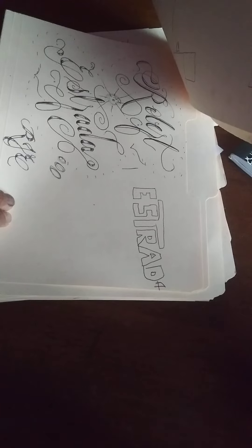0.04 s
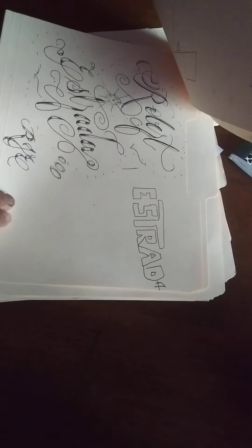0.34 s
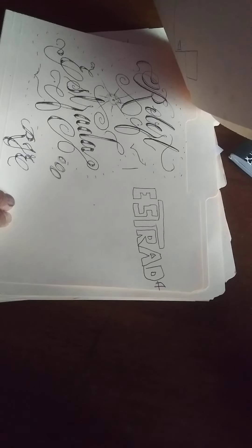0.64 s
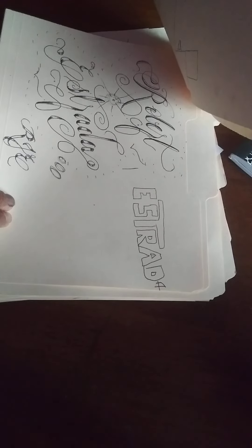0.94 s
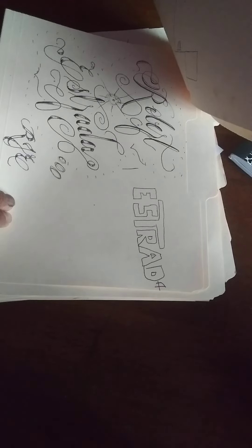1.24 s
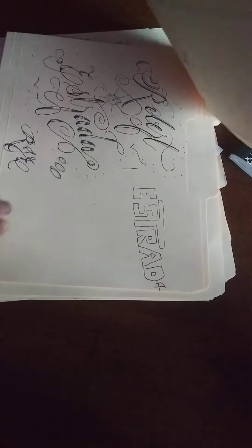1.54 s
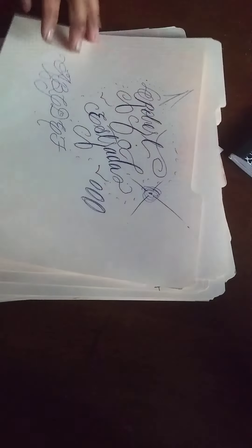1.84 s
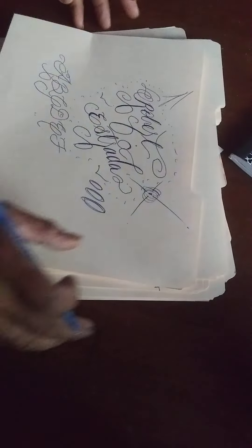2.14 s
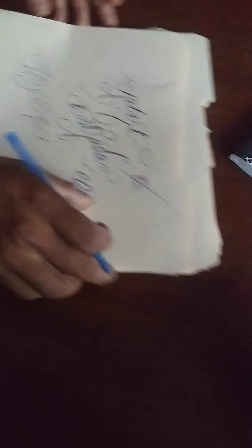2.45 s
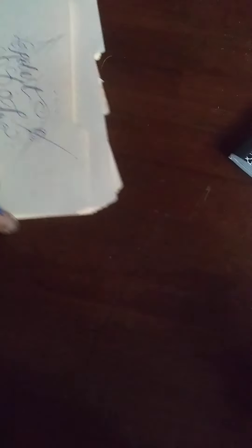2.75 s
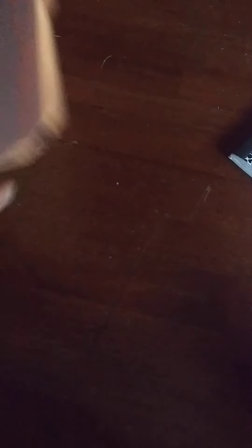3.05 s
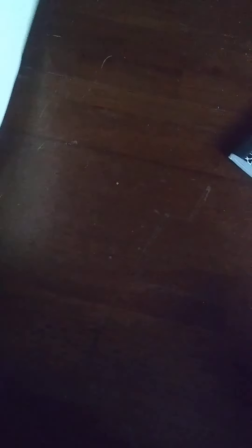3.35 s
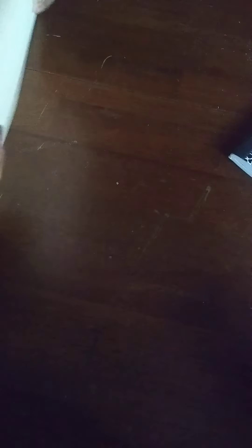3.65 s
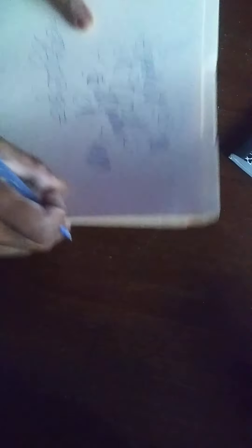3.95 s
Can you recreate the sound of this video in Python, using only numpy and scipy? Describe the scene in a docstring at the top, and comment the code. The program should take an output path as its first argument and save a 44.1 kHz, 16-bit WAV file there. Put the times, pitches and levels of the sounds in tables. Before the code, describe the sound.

Paper folders are handled, dragged over wood and dropped with a sharp slap.

```python
"""A fan hums faintly in a small, quiet room while card folders are handled on a wooden table.
First one folder is peeled off the pile, its fibres catching and its edge scraping along a neighbour.
Then fingers grip the pile and slide it off the table edge with dull bumps; it rustles in the hands.
Finally it is slapped down: the sheets land in a quick cascade, the table and the room ring,
and a last soft rustle follows."""
import sys
import numpy as np
from scipy import signal
from scipy.fft import rfft, irfft, next_fast_len
from scipy.io import wavfile
from scipy.ndimage import uniform_filter1d, minimum_filter1d, map_coordinates

SR = 44100
rng = np.random.default_rng(int(sys.argv[2]) if len(sys.argv) > 2 else 0)


def digitize_waveform(pressure):
    """Quantize a signal to 16-bit integers and store it at the path in sys.argv[1].

    Rows of a 2-D input are taken as channels; values are limited to [-1, 1].
    """
    field = np.atleast_2d(pressure).T
    bounded = np.clip(field, -1, 1)
    quanta = np.round(bounded * 32767).astype(np.int16)
    wavfile.write(sys.argv[1], SR, quanta)


N = 176400

# Impacts: start_s, level_db, cutoff_hz
SHEET_LANDINGS = [(3.5446, -33.5, 1120), (3.5557, -19, 10100), (3.564, -19, 9050), (3.5703, -18, 9000),
                  (3.576, -20, 9000), (3.5825, -19, 22000), (3.593, -23.5, 9000), (3.604, -26, 7040),
                  (3.624, -26.5, 2020), (3.639, -24.5, 885)]  # sheets landing one after another
TABLE_BUMPS = [(1.587, -58, 900), (1.908, -53.5, 1100), (1.926, -53, 1300), (2.207, -59, 1100),
               (2.246, -50.5, 294), (2.465, -54, 400), (2.518, -52.5, 308), (2.673, -51, 453),
               (2.786, -44.5, 310), (2.815, -47.5, 230), (3.003, -48.5, 324), (3.1331, -52, 2400),
               (3.142, -50.5, 1660), (3.149, -51, 1890)]  # hands and pile bumping the table
EDGE_FLICKS = [(1.591, -51.5, 12000), (1.608, -54.5, 7900), (1.629, -52, 7000), (3.143, -50, 8800),
               (3.276, -54.5, 6100), (3.795, -52, 12000)]  # card edges flicking past each other
# Spectra of those impacts: frequency_hz, gain_db
SLAP_SPECTRUM = [(70, -16.5), (110, -13), (200, -15), (250, -3.5), (420, 1.5), (580, -3.5), (1000, -2),
                 (1350, -7.5), (2500, -13.5), (3700, -20), (4700, -21), (5700, -27.5), (7200, -24),
                 (15000, -18.5)]
BUMP_SPECTRUM = [(70, -9), (120, 4.5), (170, 2.5), (260, 9.5), (380, -1.5), (750, 0.5), (1500, -2),
                 (6000, -6)]
FLICK_SPECTRUM = [(300, -14), (1500, 4.5), (4800, 0), (10000, 4.5), (15000, -3)]
# Resonances of the room and table that ring after a slap or bump: pitch_hz, relative_level_db, t60_s
RINGING_MODES = [(115.8, -11.5, 0.34), (246, -3, 0.34), (258.6, -9, 0.29), (338, -4, 0.4),
                 (376.7, -5.5, 0.22), (426.6, 6.5, 0.29), (525, -1.5, 0.33), (560, -4, 0.36),
                 (636, -3.5, 0.22), (656, 1.5, 0.25), (726, 4.5, 0.27), (787, -12.5, 0.54), (884, 1, 0.39),
                 (920, 6, 0.21), (1023, -1, 0.25), (1077, -5.5, 0.38), (1113, -2.5, 0.39), (1156, -4, 0.24),
                 (1618, -6.5, 0.36)]
# Envelopes of rubbing: time_s, relative_level_db
PEEL_ENVELOPE = [(1.41, -81), (1.46, -60), (1.52, -55), (1.565, -53), (1.595, -50), (1.665, -51.5),
                 (1.74, -52.5), (1.78, -50), (1.87, -52), (1.915, -49), (1.94, -44.5), (1.966, -58),
                 (2.05, -87)]  # folder peeled off the pile
SLIDE_ENVELOPE = [(2.2, -78), (2.222, -62), (2.295, -67), (2.335, -51.5), (2.375, -47.5), (2.41, -38.5),
                  (2.465, -33.5), (2.49, -48), (2.54, -46), (2.63, -42.5), (2.71, -39), (2.79, -40),
                  (2.86, -48.5), (2.96, -50), (3.015, -43), (3.05, -58), (3.12, -59)]  # pile slid across the table
SHIFT_ENVELOPE = [(3.12, -66), (3.16, -52.5), (3.26, -55.5), (3.3, -41), (3.345, -48.5), (3.4, -52),
                  (3.46, -53), (3.54, -44.5), (3.82, -56.5), (3.94, -52.5), (3.98, -47), (4.04, -48)]  # sheets shifting in the hands
# Spectra of that rubbing: frequency_hz, gain_db
PEEL_SPECTRUM = [(100, -4), (300, -1), (800, 0.5), (1500, -0.5), (4500, 0), (7000, -1), (15000, -3.5)]
SLIDE_SPECTRUM = [(100, -7), (270, -1.5), (1200, 1.5), (2500, 2), (4000, 0), (4900, 1.5), (5700, -1.5),
                  (7200, 0), (15000, -2.5)]
SHIFT_SPECTRUM = [(100, -19), (270, 4.5), (500, 1), (1000, 0.5), (3500, -1), (5000, 0.5), (15000, 0.5)]
# Resonant scrapes: time_s, level_db, resonance_hz
PILE_DRAG = [(2.19, -65, 595), (2.215, -51.5, 550), (2.29, -52, 516), (2.365, -47.5, 540),
             (2.39, -48, 1030), (2.425, -47, 1150), (2.47, -55, 1130), (2.5, -53, 860), (2.55, -51, 530),
             (2.6, -53.5, 860), (2.76, -56, 885), (2.88, -54, 950), (2.95, -48, 1080), (3.04, -53.5, 940),
             (3.1, -77, 940), (3.82, -86, 950), (3.92, -56, 930), (4.03, -54, 940)]  # pile dragging on the wood
EDGE_SCRAPE = [(1.72, -64, 2550), (1.782, -50.5, 3000), (1.84, -70, 3450)]  # a folder's edge along its neighbour
FINGER_SKID = [(2.21, -67, 4700), (2.226, -59.5, 4670), (2.3, -70, 4700)]  # fingers taking hold of the top folder
FINGERTIP_BRUSH = [(2.205, -72, 9000), (2.226, -54, 10500), (2.25, -68, 10000)]  # fingertips landing on the card
# Air noise of the fan: frequency_hz, gain_db
FAN_AIR_SPECTRUM = [(40, -1), (125, 2.5), (190, -1), (350, 0), (520, -3.5), (750, -2.5), (1150, -8),
                    (2200, -15), (2650, -14.5), (3700, -18), (7500, -19), (10000, -16.5), (15000, -3.5)]
# Tones of the fan: pitch_hz, level_db
FAN_TONES = [(454, -65), (429, -75)]
# Reverberation time of the room: frequency_hz, t60_s
ROOM_DECAY = [(100, 0.47), (300, 0.31), (900, 0.49), (2500, 0.47), (7000, 0.44), (15000, 0.27)]
# Response of the microphone: frequency_hz, gain_db
MIC_RESPONSE = [(20, -40), (80, -15.5), (105, -4.5), (1000, -0.5), (5900, 0), (6800, 5), (7650, 6.5),
                (8200, -5), (10000, -12), (13000, -24.5), (15800, -29)]


def slap(ring_start_s=3.564, ring_db=-16.5):
    """Impact excitation: one edge touches, then the sheets clap down and set room and table ringing."""
    out = np.zeros(N)
    for start_s, level_db, cutoff_hz in SHEET_LANDINGS:
        add(out, start_s, amp(level_db) * contact(SLAP_SPECTRUM, cutoff_hz, t60_s=0.014, room_db=5.5))
    add(out, ring_start_s, amp(ring_db) * ring())
    return out


def contact(spectrum, cutoff_hz, t60_s, room_db, rise_s=0.0012):
    """Cushioned impact: card yields, so the burst swells briefly. With room, rms 1 over 30 ms."""
    tail = room_tail()
    t = np.arange(len(tail)) / SR
    burst = rng.standard_normal(len(t)) * amp(-60 * t / t60_s) * (1 - np.exp(-t / rise_s))
    hit = coloured(burst / np.linalg.norm(burst) + amp(room_db) * tail, spectrum, cutoff_hz)
    return hit / np.std(hit[:int(0.03 * SR)])


def ring(cutoff_hz=np.inf, rise_s=0.008):
    """Resonance: after an impact, modes of the room and table swell and die away as damped sinusoids."""
    t = np.arange(SR) / SR
    modes = np.zeros(SR)
    for pitch_hz, level_db, t60_s in RINGING_MODES:
        envelope = softness(pitch_hz, cutoff_hz) * amp(level_db - 60 * t / t60_s)
        modes += envelope * np.sin(2 * np.pi * (pitch_hz * t + rng.random()))
    return modes * (1 - np.exp(-t / rise_s))


def softness(hz, cutoff_hz):
    """Contact compliance: a soft contact excites little above its cut-off."""
    return 1 / np.sqrt(1 + (hz / cutoff_hz) ** 6)


def rub(envelope, spectrum, flutter_db=0.93):
    """Sliding friction: paper gives broadband noise that swells and fades with the stroke."""
    gain, = curves(envelope)
    flutter = amp(flutter_db * wobble(77))
    return in_room(gain * flutter * unit(coloured(fibres(), spectrum)))


def scrape(stroke, half_width_octaves=0.77, core_db=2.5, core_half_width_octaves=0.11):
    """Friction-driven resonance: juddering card sounds in one gliding band with a narrow, sharper peak at its
    centre."""
    gain, resonance_hz = curves(stroke)
    hz, t, friction = signal.stft(fibres(), SR, nperseg=1024)
    octaves = np.log2((hz[:, None] + 1) / np.interp(t * SR, np.arange(N), resonance_hz))
    core = amp(core_db) / (1 + (octaves / core_half_width_octaves) ** 2)
    band = (1 + core) / (1 + (octaves / half_width_octaves) ** 2) ** 2
    judder = signal.istft(friction * band / np.linalg.norm(band, axis=0), SR, nperseg=1024)[1][:N]
    return in_room(gain * unit(judder))


def fibres(catches_per_s=2600, catch_power_share=0.34):
    """Stick-slip friction: paper fibres make tiny catches of uneven size over a smooth hiss."""
    catches = (rng.random(N) < catches_per_s / SR) * rng.standard_normal(N)
    hiss = rng.standard_normal(N)
    return np.sqrt(catch_power_share) * unit(catches) + np.sqrt(1 - catch_power_share) * hiss


def bumps(ring_offset_db=-9):
    """Soft impacts: hands and pile thud on the wood; room and table ring mainly below a cut-off."""
    out = np.zeros(N)
    for start_s, level_db, cutoff_hz in TABLE_BUMPS:
        add(out, start_s, amp(level_db) * contact(BUMP_SPECTRUM, cutoff_hz, t60_s=0.033, room_db=2))
        add(out, start_s, amp(level_db + ring_offset_db) * ring(cutoff_hz))
    return out


def flicks():
    """Brief impacts have wide spectra: card edges tick brightly as they pass each other."""
    out = np.zeros(N)
    for start_s, level_db, cutoff_hz in EDGE_FLICKS:
        add(out, start_s, amp(level_db) * contact(FLICK_SPECTRUM, cutoff_hz, t60_s=0.009, room_db=0))
    return out


def fan(air_db=-55, drift_rad=0.34):
    """Tonal and broadband noise: two tones with slight phase modulation over a steady rush of air."""
    t = np.arange(N) / SR
    tones = sum(amp(level_db) * np.sqrt(2) * np.sin(2 * np.pi * pitch_hz * t + drift_rad * wobble(7.44))
                for pitch_hz, level_db in FAN_TONES)
    air = amp(air_db) * unit(coloured(rng.standard_normal(N), FAN_AIR_SPECTRUM))
    return tones + air


def room_tail(rise_s=0.0028):
    """Diffuse reverberation: a random impulse response of energy 1, each band decaying at its own rate."""
    hz, t, noise = signal.stft(rng.standard_normal(SR * 3 // 4), SR, nperseg=256)
    decay = amp(-60 * t / along(ROOM_DECAY, hz)[:, None])
    tail = signal.istft(noise * decay, SR, nperseg=256)[1]
    tail *= 1 - np.exp(-np.arange(len(tail)) / SR / rise_s)
    return tail / np.linalg.norm(tail)


def in_room(direct, room_db=-6.5):
    """Convolution with the room adds reverberation; the total power stays about the same."""
    wet = amp(room_db)
    reverberation = signal.fftconvolve(direct, room_tail())[:N]
    return (direct + wet * reverberation) / np.hypot(1, wet)


def coloured(x, spectrum, cutoff_hz=np.inf):
    """Minimum-phase filtering by a spectrum and an optional soft low-pass."""
    size = 2 * next_fast_len(len(x))
    hz = np.fft.rfftfreq(size, 1 / SR)
    cepstrum = irfft(np.log(amp(along(spectrum, hz)) * softness(hz, cutoff_hz)))
    # folding the cepstrum onto positive time makes the filter causal
    cepstrum[1:size // 2] *= 2
    cepstrum[size // 2 + 1:] = 0
    return irfft(rfft(x, size) * np.exp(rfft(cepstrum)))[:len(x)]


def amp(db):
    """Amplitude ratio of a level in decibels."""
    return 10 ** (np.asarray(db) / 20)


def unit(x):
    """Normalisation to rms 1."""
    return x / np.sqrt(np.mean(x ** 2) + 1e-20)


def along(points, hz):
    """Interpolation on a logarithmic frequency axis."""
    frequency_hz, values = np.transpose(points)
    return np.interp(np.log(hz + 1), np.log(frequency_hz + 1), values)


def curves(rows):
    """Interpolation in time: a gain per sample (silent outside the rows), then any further columns."""
    time_s, level_db, *columns = np.transpose(rows)
    t = np.arange(N) / SR
    gain = amp(np.interp(t, time_s, level_db, left=-np.inf, right=-np.inf))
    return [gain] + [np.interp(t, time_s, column) for column in columns]


def wobble(knots_per_s):
    """Smooth random modulation: a spline through Gaussian knots."""
    knots = rng.standard_normal(int(N * knots_per_s / SR) + 4)
    return map_coordinates(knots, [np.arange(N) * knots_per_s / SR])


def add(out, start_s, x):
    """Superposition of x onto out from start_s on."""
    part = out[round(start_s * SR):][:len(x)]
    part += x[:len(part)]


def scene(rubbing_db=2):
    """Superposition: the friction and impacts of the folders add to the sound of the fan."""
    rubbing = rub(PEEL_ENVELOPE, PEEL_SPECTRUM)
    rubbing += rub(SLIDE_ENVELOPE, SLIDE_SPECTRUM)
    rubbing += rub(SHIFT_ENVELOPE, SHIFT_SPECTRUM)
    scrapes = scrape(PILE_DRAG, half_width_octaves=1)
    scrapes += scrape(EDGE_SCRAPE) + scrape(FINGER_SKID) + scrape(FINGERTIP_BRUSH)
    return (amp(rubbing_db) * rubbing + scrapes + bumps() + flicks() + slap() + fan())[None]


def record(dry, ceiling=0.68, limiter_s=0.0013, top_hz=15750):
    """Transduction: a small microphone with a treble peak, then a fast limiter and a steep band limit."""
    x = coloured(dry[0], MIC_RESPONSE)
    span = int(limiter_s * SR)
    needed_gain = np.minimum(1, ceiling / (np.abs(x) + 1e-9))
    limited = x * uniform_filter1d(minimum_filter1d(needed_gain, span), span)
    size = next_fast_len(N + SR // 2)
    passband = np.fft.rfftfreq(size, 1 / SR) < top_hz
    return irfft(rfft(limited, size) * passband, size)[None, :N]


dry = scene()
out = record(dry)
digitize_waveform(out)
```